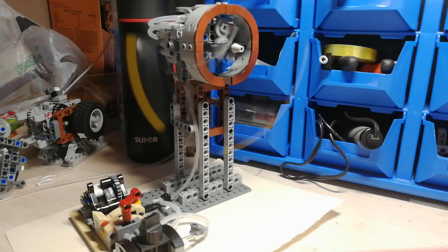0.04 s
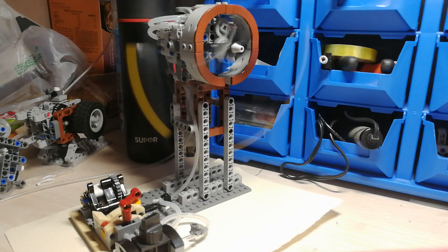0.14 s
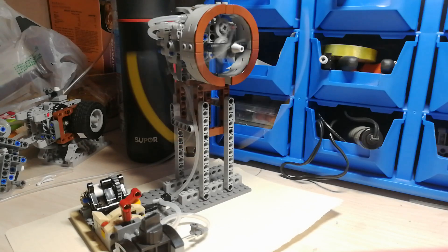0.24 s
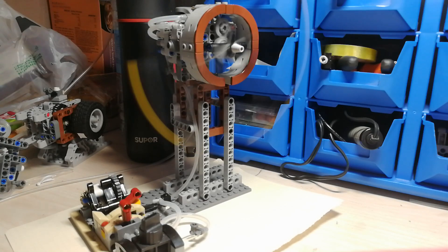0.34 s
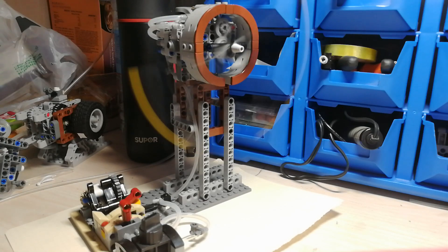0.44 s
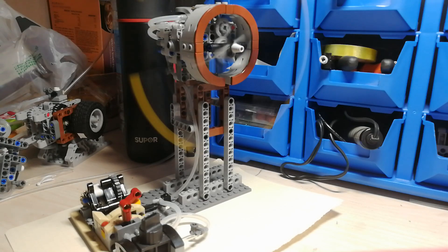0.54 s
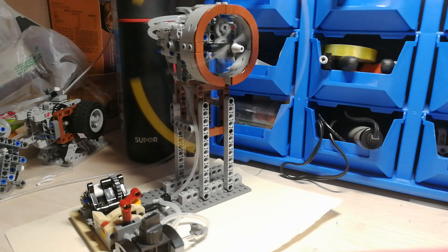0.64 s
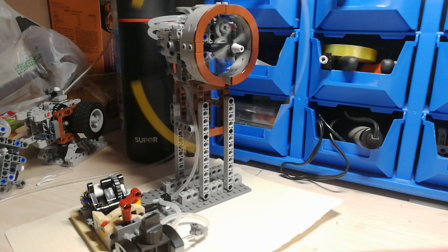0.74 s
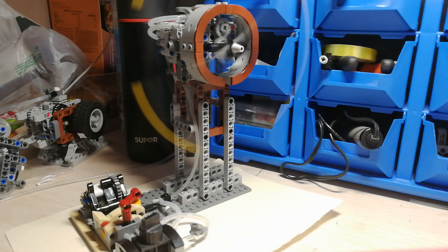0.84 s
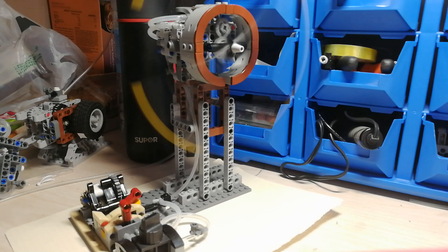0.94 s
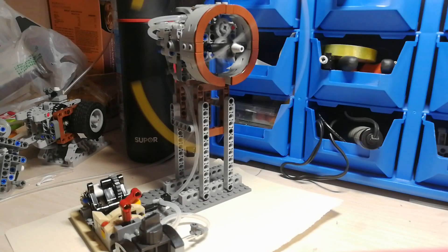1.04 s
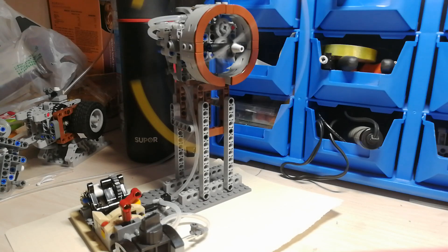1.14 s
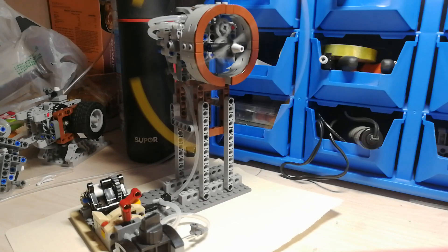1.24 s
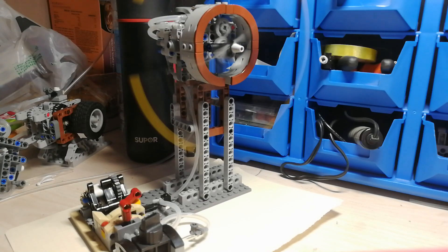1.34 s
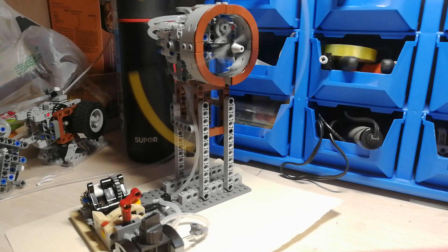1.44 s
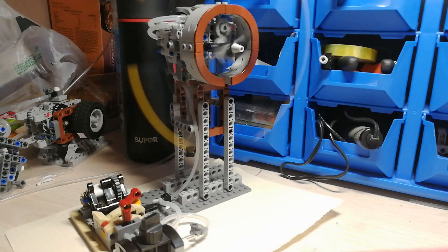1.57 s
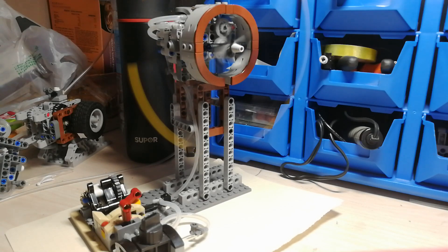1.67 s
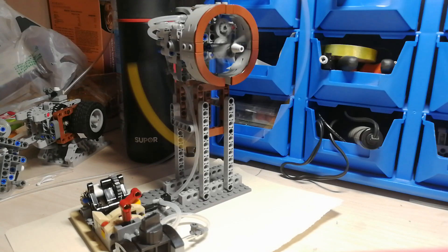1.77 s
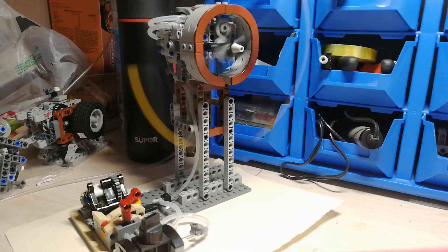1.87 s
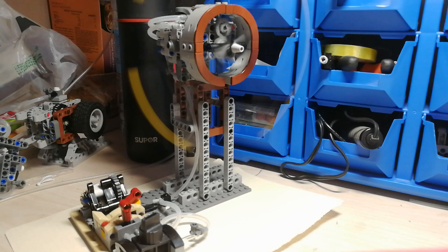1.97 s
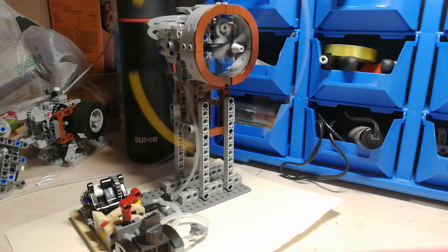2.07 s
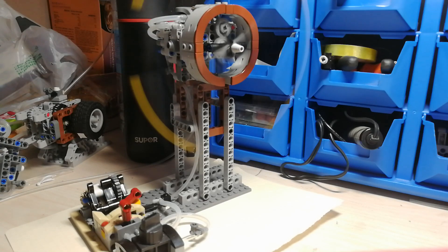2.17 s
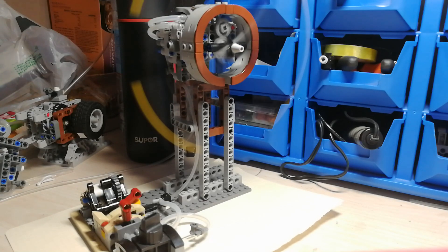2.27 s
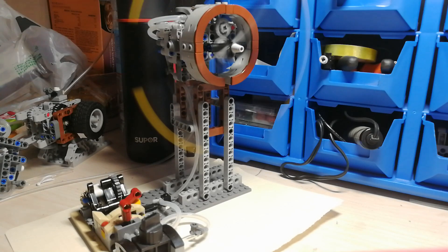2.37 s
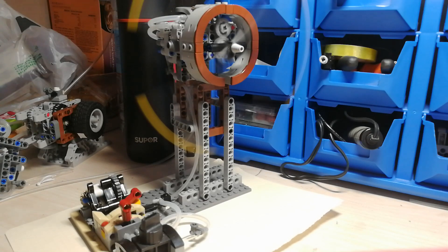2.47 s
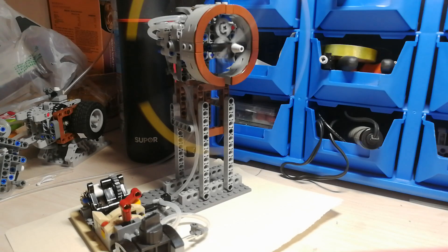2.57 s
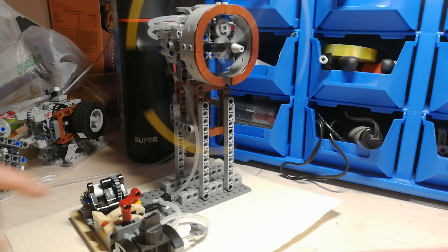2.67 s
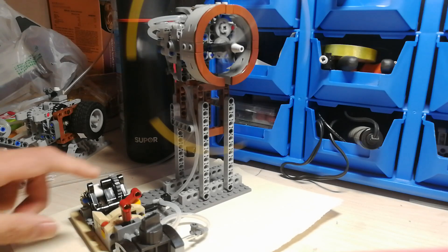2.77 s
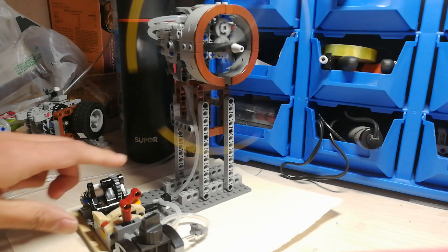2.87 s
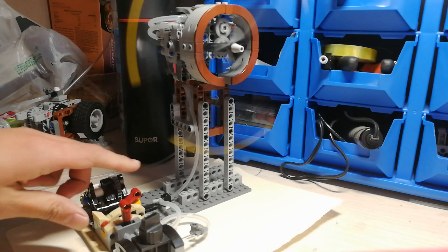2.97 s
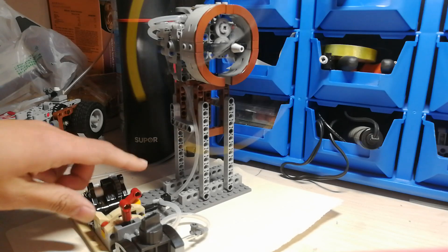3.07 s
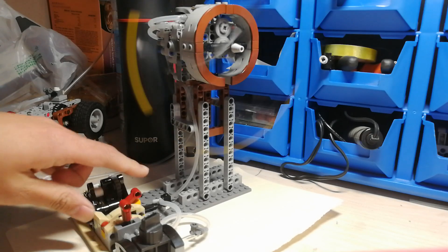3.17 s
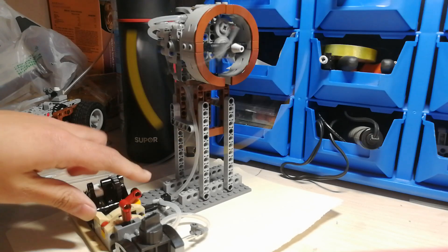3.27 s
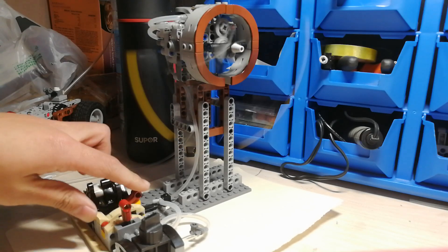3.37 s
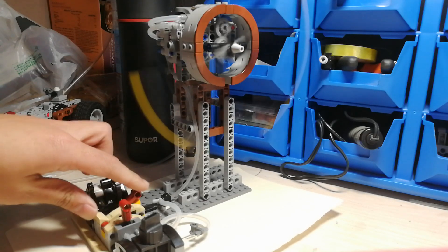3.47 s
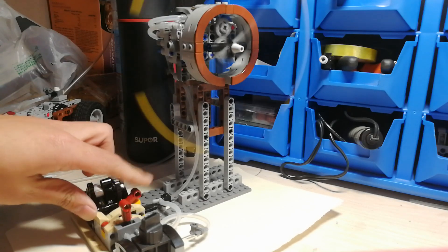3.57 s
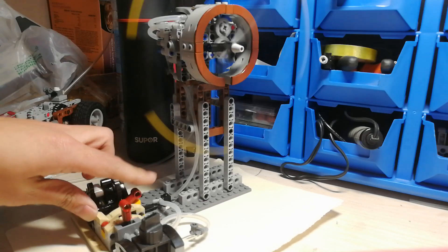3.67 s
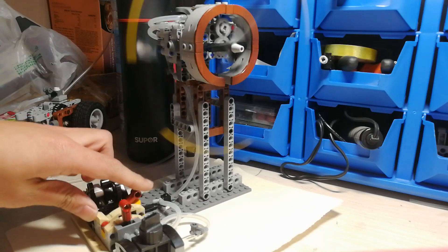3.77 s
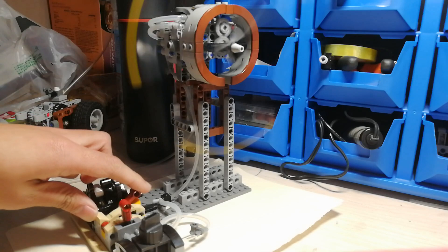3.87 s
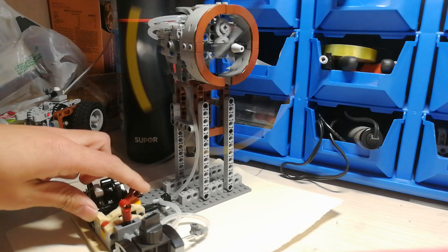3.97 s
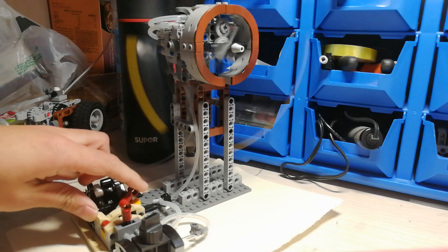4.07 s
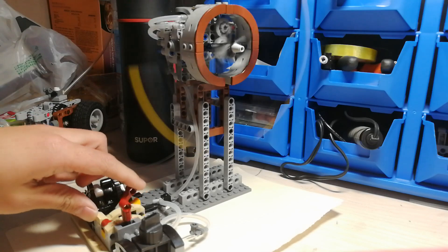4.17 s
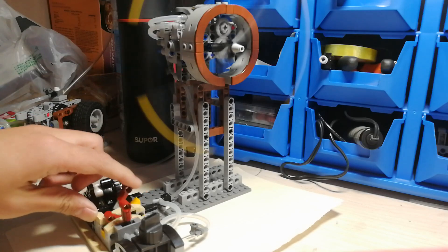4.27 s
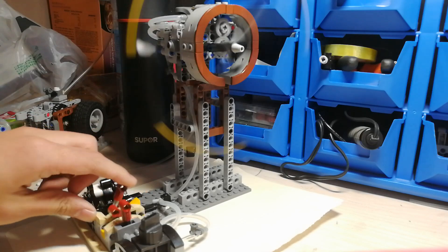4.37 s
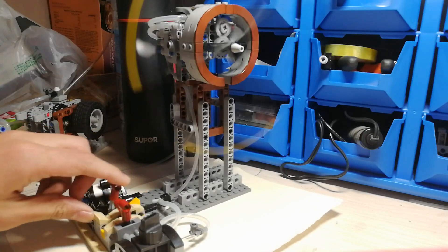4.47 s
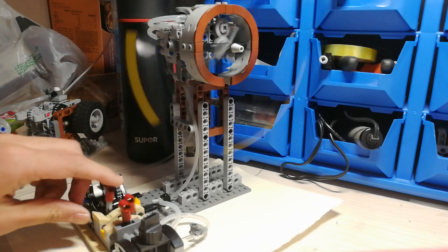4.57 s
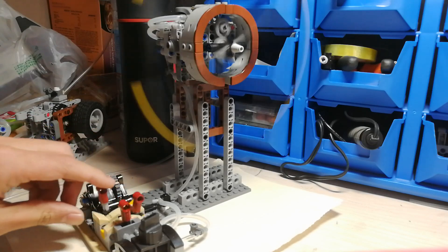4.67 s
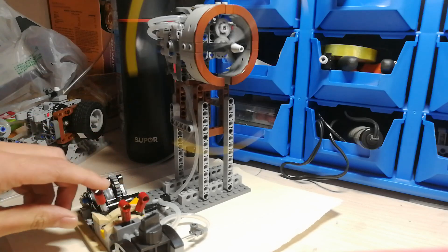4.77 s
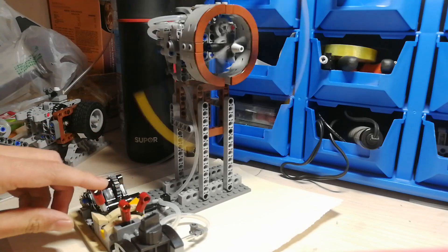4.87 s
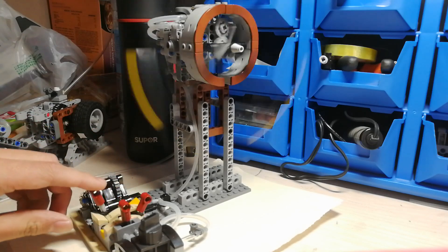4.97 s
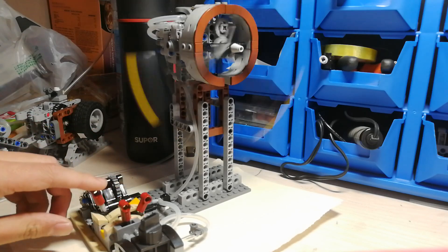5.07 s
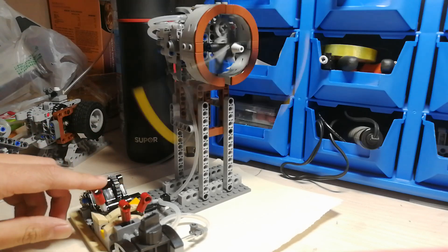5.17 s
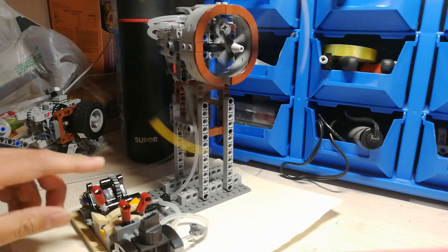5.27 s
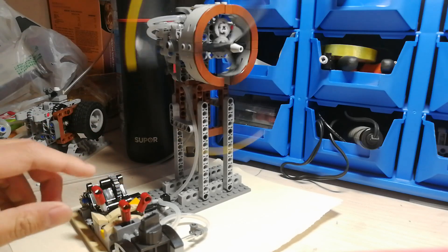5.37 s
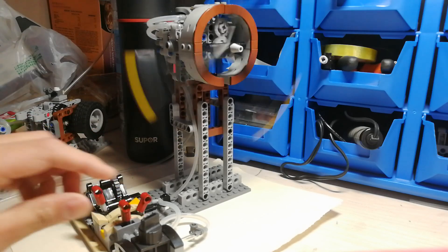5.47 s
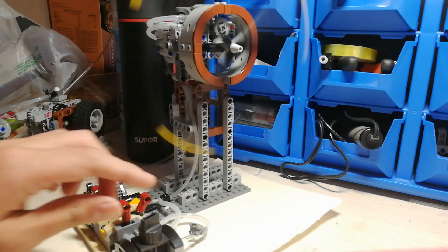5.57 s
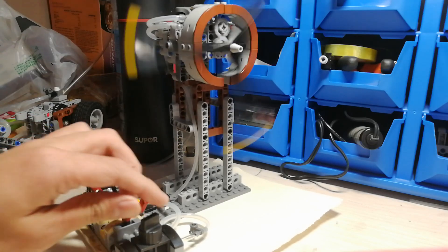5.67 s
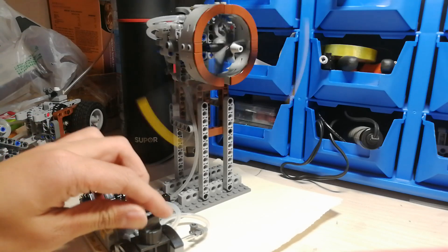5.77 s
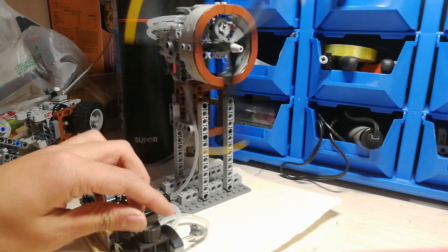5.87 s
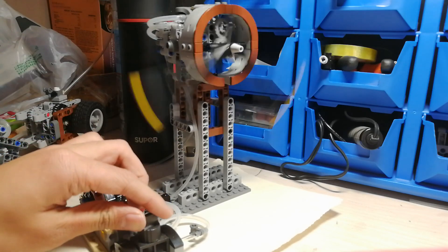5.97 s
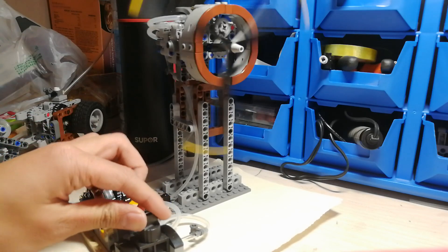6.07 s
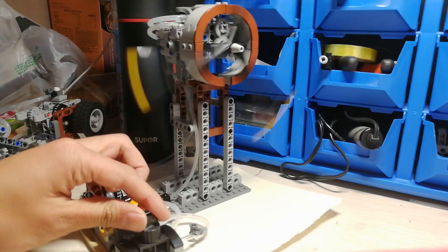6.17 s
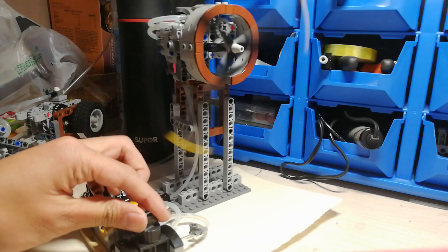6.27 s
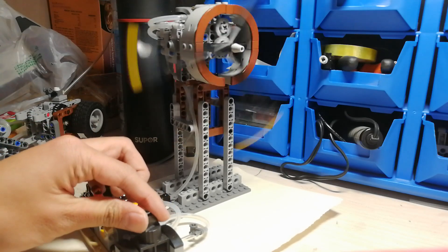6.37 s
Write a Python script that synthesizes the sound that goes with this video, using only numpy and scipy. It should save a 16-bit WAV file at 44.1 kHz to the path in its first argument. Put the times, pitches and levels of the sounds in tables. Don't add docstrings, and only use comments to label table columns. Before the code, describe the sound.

A small plastic air engine chuffs and ticks rapidly on a workbench, hissing steadily, then slows to half speed as its air is throttled.

```python
import sys
import numpy as np
from scipy import signal
from scipy.fft import rfft, irfft, next_fast_len
from scipy.io import wavfile
from scipy.ndimage import uniform_filter1d

SR = 44100
rng = np.random.default_rng(int(sys.argv[2]) if len(sys.argv) > 2 else 0)


def level_to_linear(level):
    exponent = np.asarray(level, float) / 20
    return 10 ** exponent


def store_pcm(level_fs):
    pcm = np.round(np.clip(level_fs, -1, 1) * 32767).astype(np.int16)
    wavfile.write(sys.argv[1], SR, np.atleast_2d(pcm).T)


N = 283563


def along(points, hz):
    f, value = np.transpose(points)
    return np.interp(np.log(hz + 1), np.log(f + 1), value)


def unit(x):
    return x / np.sqrt(np.mean(x ** 2) + 1e-20)


def filtered(x, response):
    size = next_fast_len(N + SR // 2)
    spectrum = rfft(x, size) * response(np.fft.rfftfreq(size, 1 / SR))
    return irfft(spectrum, size)[..., :N]


def ringing(modes, f):
    total = 0
    for k, (centre, width, left_db, right_db) in enumerate(modes):
        peak = 1j * f * width / (centre ** 2 - f ** 2 + 1j * f * width)
        total = total + (-1) ** k * level_to_linear([[left_db], [right_db]]) * peak
    return total


def bursts(times, level_db, rise_s, t60_s):
    power = np.zeros(N + 2 * SR)
    t = np.arange(SR // 4) / SR
    shape = (1 - np.exp(-t / rise_s)) * level_to_linear(-60 * t / t60_s)
    shape /= shape.max()
    for s, db in zip(times, level_db):
        start = round((s + 0.5) * SR)
        power[start:start + len(t)] += (level_to_linear(db) * shape) ** 2
    return np.sqrt(power[SR // 2:][:N])


def grit(envelope, response, alike, lag_s, rough_db, patchy_db, ticks=0):
    sputter = level_to_linear(rough_db * unit(uniform_filter1d(rng.standard_normal(N), size=24)))
    z = signal.stft(rng.standard_normal((3, N)), nperseg=128)[2]
    field = uniform_filter1d(rng.standard_normal(z.shape[1:]), size=3, axis=0)
    field = uniform_filter1d(field, size=8, axis=1)
    patchy = signal.istft(z * level_to_linear(patchy_db * unit(field)), nperseg=128)[1][:, :N]
    noise = unit(sputter * patchy)
    noise[0] += ticks * (rng.random(N) < 0.006) * rng.standard_normal(N)
    pair = np.sqrt(alike) * noise[0] + np.sqrt(1 - alike) * noise[1:]

    def late(f):
        return response(f) * np.exp(-2j * np.pi * f * lag_s * np.array([[0], [1]]))

    return filtered(pair * envelope, late) / np.std(filtered(pair, late))


# t/s, chuff level/dB, then tail, piston knock, frame knock level/dB re chuff
DOWN_STROKES = [(-0.0145, -21.5, -5, 0, -2), (0.0866, -22.5, -4, -10, -13), (0.188, -20, -11.5, -13, -25),
                (0.2896, -19, -14, -20.5, -20), (0.3897, -21.5, -7, -11, -19.5),
                (0.4913, -17.5, -16, -14.5, -28), (0.5932, -20.5, -11, -14, -22),
                (0.695, -24.5, -3, -10.3, -14), (0.794, -22.5, -5, -11.5, -17.2),
                (0.894, -24, -5.5, -13, -15), (0.9938, -24, -2.5, -10.2, -13),
                (1.094, -28.5, 3, -9.5, -9.5), (1.1942, -20, -9, -14, -26), (1.2917, -28, 2.5, -9.2, -8),
                (1.3919, -23, -1.9, -8.5, -16), (1.4925, -22.5, -8, -13.1, -14),
                (1.591, -23.5, -5, -11.5, -15), (1.69, -23, -9, -13, -16.2),
                (1.7906, -25, -1.9, -10, -12.5), (1.8907, -19, -9, -15.5, -24),
                (1.9926, -22.5, -5.5, -13, -13), (2.0934, -21.5, -9, -16.5, -15),
                (2.1923, -21.5, -3.5, -9, -21), (2.294, -21.5, -8.5, -11, -19.5),
                (2.3961, -20, -6.5, -13.5, -19), (2.497, -22, -7, -8.5, -18),
                (2.6003, -23, -7.5, -13.5, -25), (2.7026, -21, -16, -14, -19),
                (2.8036, -19.5, -15, -16, -26), (2.905, -20, -12, -15.5, -27),
                (3.0076, -21.5, -6, -10.5, -21), (3.1118, -24.5, -3.2, -12, -14.5),
                (3.2132, -18.5, -19, -17, -21), (3.3182, -23, -5.5, -10, -14), (3.4223, -24, -2, -14, -14),
                (3.5255, -19.5, -10.5, -20, -17), (3.6303, -21.5, -8, -12, -15),
                (3.7351, -21.5, -8.5, -13, -17.5), (3.8393, -23.5, -4.5, -11, -16),
                (3.9451, -21.5, -7, -15, -17), (4.0496, -25.5, -2.5, -10.6, -12),
                (4.1552, -25.5, -0.5, -13, -16.5), (4.261, -23, -3, -11, -21),
                (4.3683, -23, -8.5, -12.0, -14.5), (4.4753, -26.5, -1.8, -6, -13.9),
                (4.5822, -22, -8.5, -10, -14.8), (4.6942, -22.5, -9.5, -11, -15),
                (4.8096, -21, -19, -19, -17.5), (4.9365, -25.5, -5, -9.7, -16),
                (5.08, -26, -14, -12.5, -16.0), (5.2393, -26.5, -9, -9.5, -17.5),
                (5.415, -28, -4.5, -11, -24), (5.599, -25, -12, -12.5, -24), (5.7885, -27, -8, -10, -20),
                (5.9778, -25.5, -4, -12, -28), (6.1704, -26, -4.1, -12, -22.2),
                (6.3615, -26, -5.5, -13.5, -22)]
# t/s, tick level/dB, then first puff, second puff, frame knock, piston knock level/dB re tick
UP_STROKES = [(0.0324, -32, 7.5, 7.5, -10, -11), (0.135, -22.5, -3.2, -5, -21, -19),
              (0.2366, -26, 0, -1, -10, -15), (0.3363, -23, 0, -3, -18, -20),
              (0.4395, -24.0, 0, -3, -14, -16), (0.5394, -27, 1.7, -1, -13, -13.4),
              (0.642, -23, 0, -11, -19, -17), (0.742, -22, -9, -3, -16.5, -19.0),
              (0.8415, -25, 0, -3, -10.5, -15.3), (0.941, -22.5, -1, -11, -19, -17),
              (1.0416, -23.5, -5, 1, -17, -17.6), (1.141, -24.5, 0.3, -13.5, -11.5, -17.0),
              (1.2408, -23.5, -1.9, -4.5, -13.5, -16), (1.3402, -29, 1, 2, -8.5, -13.6),
              (1.439, -26.5, 3, -17, -11.5, -15.5), (1.5395, -26, 0.5, -1, -9.5, -15),
              (1.638, -26.5, 2, -4.5, -11.5, -16), (1.738, -22.5, -2, -8, -21, -16.3),
              (1.8392, -24, -4, -0.5, -12.5, -18), (1.9393, -27.5, 0, 0.6, -7.5, -14.5),
              (2.0405, -27.5, 1, 2, -13, -16), (2.142, -22, -9, -3, -15, -18),
              (2.241, -23, -1.5, -6, -17, -19), (2.3433, -28.5, 4, -1.5, -8.5, -13),
              (2.4439, -23, -1, -5.5, -22, -16), (2.5461, -24.1, -1, -4, -17.6, -18),
              (2.6464, -24.5, -1, -3, -22, -12.5), (2.7498, -26, -2, 0, -12.5, -16),
              (2.8512, -27.3, 3.5, -2, -9, -11.3), (2.954, -29.5, 8.5, -9, -9, -9),
              (3.0576, -26.5, 4, -7, -12, -16), (3.1592, -23, -6, -1, -13.5, -18),
              (3.2634, -26.0, -1.5, 0.9, -16.4, -15), (3.367, -26, -1.5, 1.6, -10, -17),
              (3.471, -27, 1, -1.5, -15, -15), (3.5754, -24, 0, -10, -16, -16.5),
              (3.681, -29, 2, 3, -10, -9.5), (3.7834, -25, 0, 0, -11, -17.5),
              (3.8899, -24, 1, -13, -19, -18), (3.9942, -28.5, 2, -3, -10, -13),
              (4.0992, -25, 0, -5, -15.3, -15.5), (4.206, -24, -1, 1, -13.5, -16.5),
              (4.311, -25.5, 2, -12, -10, -14.5), (4.4184, -31, 5.5, 5.3, -10, -12),
              (4.526, -28.5, 2.7, -5, -10, -13.6), (4.636, -23.5, -2.5, -14, -16.5, -20),
              (4.7465, -23.5, -0.5, -12, -15.8, -16), (4.868, -23, -5, -7, -19.5, -16.5),
              (5.001, -26.5, 0, -14, -13.5, -15.5), (5.1528, -33, -1.7, 0.5, -6.5, -6),
              (5.3193, -30, -4, -4.2, -15.5, -15), (5.5007, -32.5, -3, -6.5, -12.2, -14),
              (5.687, -30.5, -4.1, -9, -11.5, -14), (5.876, -31.5, -5, -5.0, -10.5, -13.5),
              (6.0669, -33.5, -0.4, -5, -9.5, -10), (6.2589, -30.5, -1, -5, -14, -12)]


def strokes():
    down, up = np.transpose(DOWN_STROKES), np.transpose(UP_STROKES)
    turn = np.diff(down[0])
    return down, up, np.append(turn, turn[-1])[:up.shape[1]]


# f/Hz, level/dB per Hz
VENT_COLOUR = [(1800, -23.5), (2600, -10), (3200, -3.5), (5400, -6), (6500, 3), (9600, -2), (11000, -5),
               (14000, -28), (16000, -51)]
# f/Hz, width/Hz, left level/dB, right level/dB
TUBES = [(3362, 140, -1.5, 6), (3936, 74, 12, 2), (4170, 96, -26, -8), (4616, 89, 13, 12.5),
         (6530, 750, -2.5, -18), (7384, 110, 12, 12), (9370, 41, -6, 9), (2966, 73, -14, 12)]
# f/Hz, level/dB per Hz
JET_COLOUR = [(6000, -15), (9000, 0), (11500, 0), (13500, -6), (16000, -35)]


def exhaust():
    down, up, turn = strokes()
    chuff = bursts(down[0], down[1] + 1, rise_s=0.0017, t60_s=0.078)
    tail = bursts(down[0] + 0.0017, down[1] + down[2] + 1, rise_s=0.0027, t60_s=0.17)
    tick = bursts(up[0], up[1] + 2, rise_s=0.00028, t60_s=0.057)
    first_puff = bursts(up[0] + 0.097 * turn, up[1] + up[2] + 1, rise_s=0.0053, t60_s=0.062)
    second_puff = bursts(up[0] + 0.17 * turn, up[1] + up[3] + 1, rise_s=0.0026, t60_s=0.061)
    flow = np.sqrt(chuff ** 2 + tail ** 2 + tick ** 2 + first_puff ** 2 + second_puff ** 2)

    def tubing(f):
        side_db = np.array([[1.2], [-1.2]])
        return level_to_linear(along(VENT_COLOUR, f) + side_db) * (1 + ringing(TUBES, f))

    spit = grit(flow, tubing, alike=0.62, lag_s=0.0002184, rough_db=2.5, patchy_db=2, ticks=4.45)
    thin = bursts(down[0] + 0.0036, down[1] - 17, rise_s=0.0032, t60_s=0.24)
    thin += bursts(up[0] + 0.08 * turn, up[1] + up[2] - 12, rise_s=0.0036, t60_s=0.15)
    jet = grit(thin, lambda f: level_to_linear(along(JET_COLOUR, f)),
               alike=0.26, lag_s=0.000498, rough_db=6.0, patchy_db=4.0)
    return spit + jet


# f/Hz, width/Hz, left level/dB, right level/dB
CYLINDER = [(996, 82, -5, -4.5), (1224, 108, -5.5, -2.5), (1413, 94, -2.5, 1.5), (1704, 87, -11, -1.5),
            (1935, 52, 2.5, -1), (2286, 68, -11, -0.5)]


def piston_knocks():
    down, up, turn = strokes()
    slap = bursts(down[0] + 0.001, down[1] + down[3] + 3, rise_s=0.0005, t60_s=0.11)
    slap += bursts(up[0], up[1] + up[5] + 3, rise_s=0.0023, t60_s=0.056)
    slap += bursts(up[0] + 0.19 * turn, up[1] + up[5] - 1.5, rise_s=0.0051, t60_s=0.075)
    return grit(slap, lambda f: ringing(CYLINDER, f),
                alike=0.92, lag_s=0.00018, rough_db=2.0, patchy_db=2.5, ticks=4.7)


# f/Hz, width/Hz, left level/dB, right level/dB
FRAME = [(527, 39, -14.5, -15.5), (704, 46, 4, -6.5), (823, 160, 1.5, -9.5)]


def frame_knocks():
    down, up, turn = strokes()
    shake = bursts(down[0] + 0.00066, down[1] + down[4] + 3, rise_s=0.00069, t60_s=0.077)
    shake += bursts(up[0] + 0.0017, up[1] + up[4] + 3, rise_s=0.0027, t60_s=0.025)
    shake += bursts(up[0] + 0.118 * turn, up[1] + up[4] - 1.5, rise_s=0.0012, t60_s=0.055)
    return grit(shake, lambda f: ringing(FRAME, f),
                alike=0.92, lag_s=0.0007, rough_db=2.0, patchy_db=1.0)


def even_strokes():
    down, up, _ = strokes()
    push = signal.savgol_filter(down[0], 7, 3)
    pull = push[:-1] + signal.savgol_filter(up[0] - down[0][:-1], 7, 3)
    return push, pull


# f/Hz, level/dB, t60/s
BENCH_PAIR = [(107, 0, .32), (94.5, 0, .32)]
# f/Hz, level/dB, t60/s
BENCH_MODES = [(58.4, -11, 0.33), (147, -21.5, 0.24), (250, -18.5, 0.084)]
# f/Hz, level/dB per Hz
RUMBLE_COLOUR = [(20, -33), (50, -2.5), (100, 4.5), (135, -14), (250, -15.5), (400, -27.5), (600, -49.5)]


def bench():
    push, pull = even_strokes()
    kicks = np.zeros(N + SR)
    kicks[np.round((push + 0.503) * SR).astype(int)] = level_to_linear(0.7 * rng.standard_normal(len(push)))
    kicks[np.round((pull + 0.502) * SR).astype(int)] = -level_to_linear(-2.5 + 0.7 * rng.standard_normal(len(pull)))
    t = np.arange(SR // 2) / SR
    board = np.zeros(len(t))
    for k, (hz, db, t60) in enumerate(BENCH_PAIR + BENCH_MODES):
        board += (-1) ** k * level_to_linear(db - 60 * t / t60) * np.sin(2 * np.pi * hz * t)
    sway = signal.fftconvolve(kicks, board)[SR // 2:][:N]
    sway /= np.sqrt(np.abs(uniform_filter1d(sway ** 2, size=SR // 3)) + 1e-9)
    rumble = grit(1, lambda f: level_to_linear(along(RUMBLE_COLOUR, f)),
                  alike=0.95, lag_s=0.0001, rough_db=2.5, patchy_db=0.0)
    s, _, drive_db = np.transpose(AIR_SUPPLY)
    drive = level_to_linear(np.interp(np.arange(N) / SR, s, drive_db))
    return drive * (sway + level_to_linear(-13) * rumble)


# multiple of shaft speed, level/dB at ten turns a second
GEAR_HUM = [(24, -58), (25, -57)]


def gear():
    push, _ = even_strokes()
    turns = np.interp(np.arange(N) / SR, push, np.arange(len(push)))
    speed = uniform_filter1d(np.gradient(turns) * SR, size=SR // 5)
    angle = 2 * np.pi * np.cumsum(speed) / SR
    return sum(level_to_linear(db) * (speed / 10) ** 5 * np.sin(k * angle) for k, db in GEAR_HUM)


# t/s, leaking air level/dB, bench drive level/dB
AIR_SUPPLY = [(0.0, -34.5, -39.5), (0.55, -33, -44), (0.7, -34.5, -40), (1.23, -36.5, -40.5),
              (2.11, -34.5, -40.5), (2.18, -36.5, -44.5), (2.54, -36, -40.5), (3.01, -36, -43),
              (3.65, -38, -40), (4.48, -37, -46), (4.69, -38.5, -42), (4.89, -41, -44.5),
              (5.17, -44.5, -50), (5.5, -44.5, -44.5), (6.11, -47, -44.5), (6.43, -43.5, -42.5)]
# f/Hz, level/dB per Hz
SEEP_COLOUR = [(150, -2.5), (400, -8), (700, -13.5), (2300, -3.5), (4000, -2), (7000, -1.5), (10000, -3.5),
               (13000, -13.5), (16000, -25)]


def leak():
    s, leak_db, _ = np.transpose(AIR_SUPPLY)
    level = level_to_linear(np.interp(np.arange(N) / SR, s, leak_db) - 0.5)

    def joints(f):
        return level_to_linear(along(SEEP_COLOUR, f)) * (1 + 0.32 * ringing(TUBES, f))

    return grit(level, joints, alike=0.24, lag_s=0.000195, rough_db=-2.2, patchy_db=4.0)


# f/Hz, t60/s
SHOP_DECAY = [(300, 0.62), (2000, 0.31), (10000, 0.1)]


def shop(x):
    hz, t, z = signal.stft(rng.standard_normal((2, SR // 3)), SR, nperseg=256)
    fade = level_to_linear(-60 * t / along(SHOP_DECAY, hz)[:, None])
    tail = signal.istft(z * fade, SR, nperseg=256)[1]
    tail /= np.linalg.norm(tail[0])
    delayed = np.pad(x, ((0, 0), (300, 0)))
    return signal.fftconvolve(delayed, tail, axes=1)[:, :N]


def scene():
    engine = exhaust() + piston_knocks() + frame_knocks()
    return engine + level_to_linear(-13.5) * shop(engine) + bench() + gear() + leak()


def band_limit(x):
    return signal.sosfilt(signal.butter(12, 16500, fs=SR, output="sos"), x)


# f/Hz, level/dB per Hz
HISS_COLOUR = [(100, -15), (1000, -9), (6000, -4), (12000, 10), (16000, -2)]


def record(dry):
    hiss = grit(level_to_linear(-53), lambda f: level_to_linear(along(HISS_COLOUR, f)),
                alike=0.1, lag_s=0.0001, rough_db=3.0, patchy_db=-3.0)
    mix = filtered(dry + hiss, lambda f: f < 15950)
    return band_limit(mix)


dry = scene()
out = record(dry)
store_pcm(out)
```